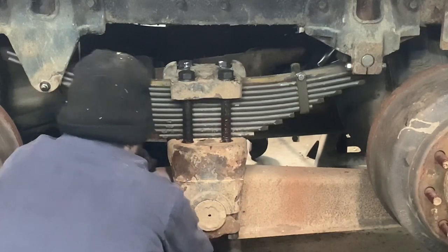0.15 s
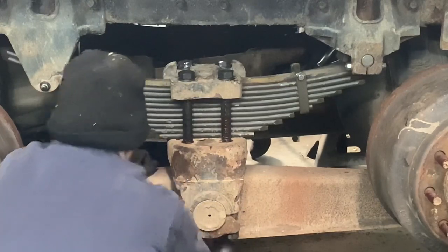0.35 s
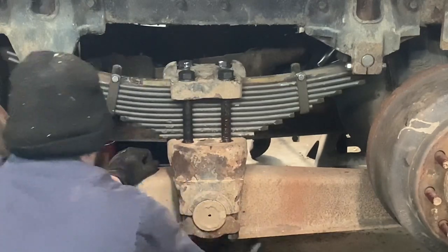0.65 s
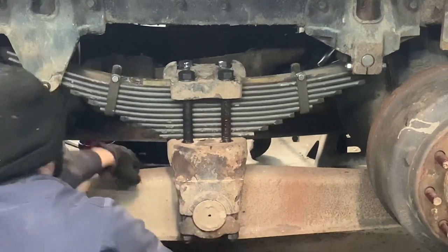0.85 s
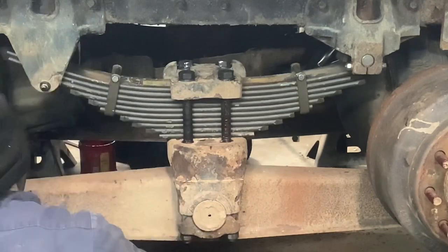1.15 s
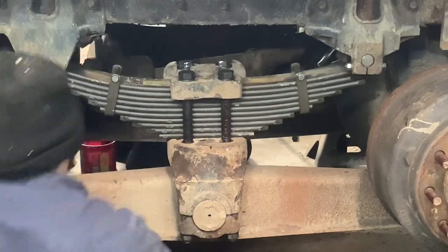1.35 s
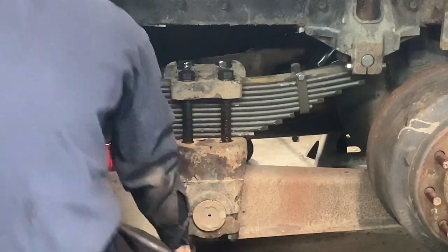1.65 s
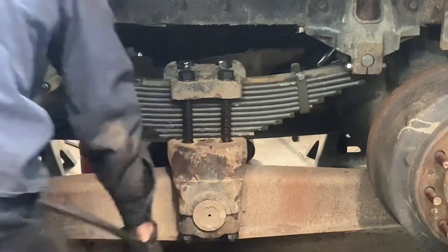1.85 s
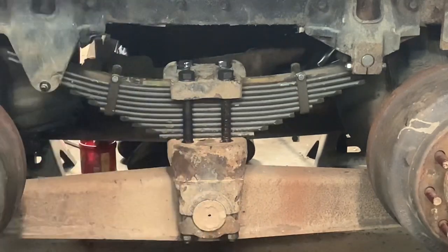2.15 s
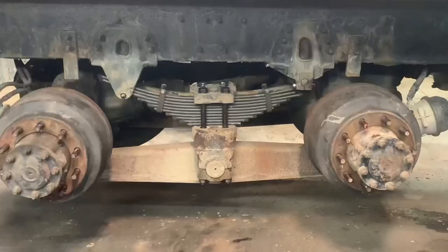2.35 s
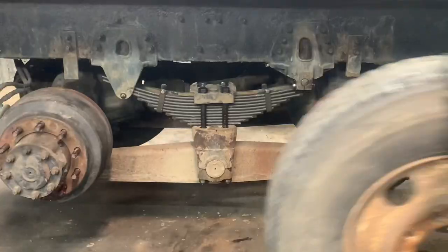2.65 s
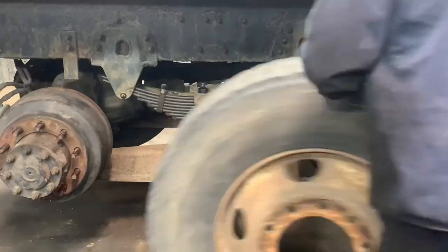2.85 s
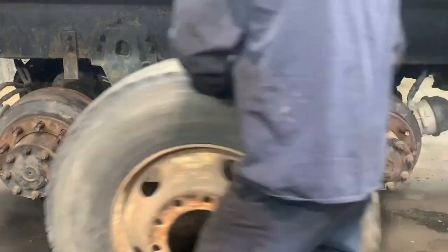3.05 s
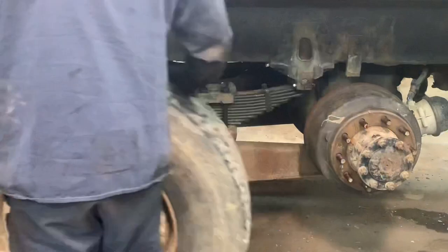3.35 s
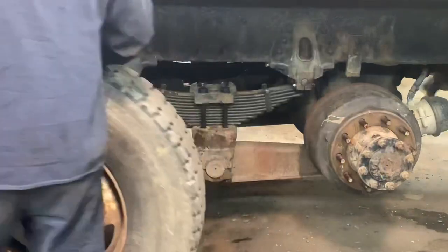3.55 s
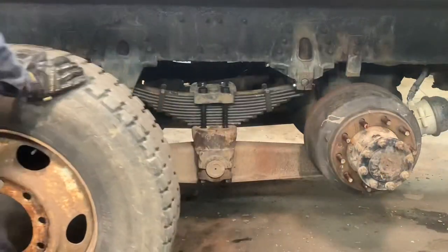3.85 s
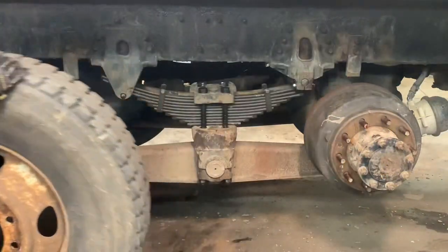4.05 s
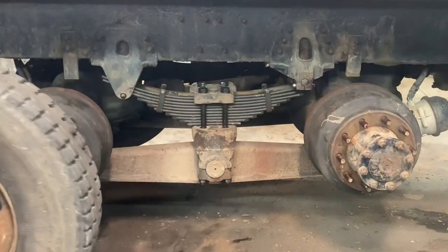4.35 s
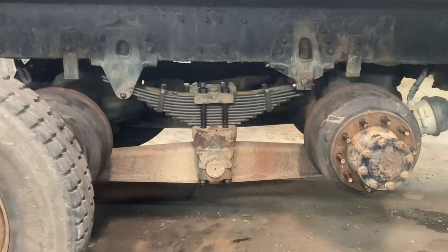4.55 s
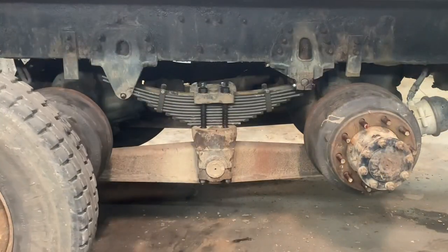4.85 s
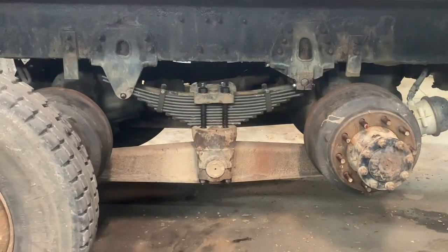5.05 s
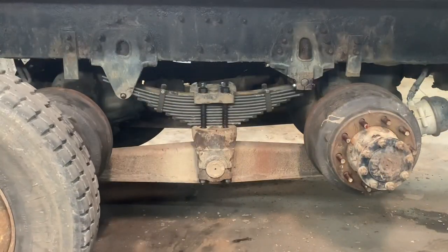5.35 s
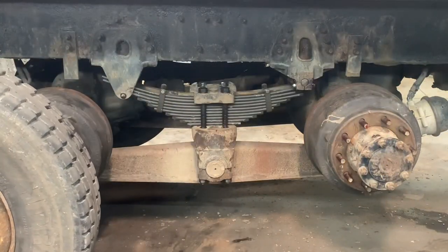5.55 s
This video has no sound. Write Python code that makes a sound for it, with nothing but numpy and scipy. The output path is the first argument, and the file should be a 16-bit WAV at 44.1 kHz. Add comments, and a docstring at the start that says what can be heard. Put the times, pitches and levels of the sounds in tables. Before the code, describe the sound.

A loud, throbbing air-tool drone roars under a truck, cuts off abruptly at just over two seconds, then quiet scuffs, tyre rolling and steel clanks follow.

```python
"""An air tool's supply machine drones under a truck in a workshop: multiples of one steady cycle, summed
as sines, over a throbbing noise roar of air and steel. A crash dies away at the start; the drone is soon cut.
Then a steel bar clanks and jingles as ringing modes, boots scuff and a tyre rolls on gritty concrete as
coloured noise, and things thud as struck dull bodies, over a low rumble of one chance-level sine and noise."""
import sys
import numpy as np
from scipy import signal
from scipy.fft import rfft, irfft, next_fast_len
from scipy.io import wavfile

SR = 44100
rng = np.random.default_rng(int(sys.argv[2]) if len(sys.argv) > 2 else 0)


def amplitude_ratio(level_db):
    """Convert a level in decibels to the matching linear amplitude (field) ratio."""
    exponent = np.asarray(level_db, float) / 20
    return 10 ** exponent


def digitize_waveform(pressure):
    """Quantize a signal to 16-bit integers and store it at the path in sys.argv[1].

    Rows of a 2-D input are taken as channels; values are limited to [-1, 1].
    """
    field = np.atleast_2d(pressure).T
    bounded = np.clip(field, -1, 1)
    quanta = np.round(bounded * 32767).astype(np.int16)
    wavfile.write(sys.argv[1], SR, quanta)


N = 250488
TIME = np.arange(N) / SR
HALF = np.array([[.5], [-.5]])   # shares a left-right difference between the two channels

# Stereo likeness of the drone's roar. Each row: frequency in Hz, correlation of left and right.
ROAR_LIKENESS = [(60, 0.98), (250, 0.48), (600, 0.96), (2000, 0.15), (5000, 0.14), (9000, 0.31)]
# Stereo balance of the roar. Each row: frequency in Hz, left over right in dB.
ROAR_BALANCE = [(60, -1.5), (100, -9.5), (180, -9.5), (320, 7.5), (550, -7.5), (960, 2), (1670, -1.5),
                (2900, 2), (5050, 1), (8790, -3.5)]
# Stereo phase of the drone and its roar. Each row: frequency in Hz, lead of the left in radians.
ROAR_LEAD = [(0, 0), (340, 0.61), (950, 1.57), (1550, 2), (1810, -2), (2330, 0), (2840, -1.5), (3360, -3.5),
             (3620, 2.7), (4310, 0.4), (5600, -0.7), (6980, -7.5), (7750, 4.5), (8960, 4.5)]
# Stereo likeness of the quiet workshop. Each row: frequency in Hz, correlation of left and right.
SHOP_LIKENESS = [(60, 0.93), (250, 1), (600, 0.81), (2000, 0.18), (5000, 0.26), (9000, 0.19)]
# Stereo balance of the quiet workshop. Each row: frequency in Hz, left over right in dB.
SHOP_BALANCE = [(60, -1.5), (100, -5.5), (180, -2), (320, 2), (550, 2.5), (960, -3), (1670, -2.5),
                (2900, 0.5), (5050, 1.5), (8790, -5.5)]
# Stereo phase of the quiet workshop. Each row: frequency in Hz, lead of the left in radians.
SHOP_LEAD = [(0, 0), (260, 1.26), (690, -1), (1460, 4), (2330, -0.5), (3360, -1.5), (3880, -4.5),
             (4220, -4), (5000, -10), (5770, -5), (6290, -8.5), (6550, -4.5), (7240, -8), (8960, -8.5)]
# Broad colour of a crash. Each row: frequency in Hz, relative density in dB per Hz.
CRASH_COLOUR = [(59, -33.5), (100, -10), (803, -12.5), (952, -17), (1290, -11.5), (1710, -10.5),
                (3200, -13), (6450, -17.5), (9240, -35), (12000, -77), (20300, -120)]


def rms_one(x):
    """Scales a signal to an rms of 1."""
    return x / np.sqrt(np.mean(x ** 2) + 1e-20)


def in_time(rows):
    """Draws straight lines through rows of a time in seconds and values, one curve per column."""
    seconds, *columns = np.transpose(rows)
    return [np.interp(TIME, seconds, column) for column in columns]


def at_hz(points, hz):
    """Reads a curve over frequency, straight on a logarithmic frequency axis."""
    points = np.array(points)
    return np.interp(np.log(hz), np.log(points[:, 0]), points[:, 1])


def drift(rate_hz):
    """Slow chance of spread 1: noise twice through a one-pole low-pass, made at every 40th sample."""
    pole = np.exp(-2 * np.pi * rate_hz * 40 / SR)
    slow = signal.lfilter([1], [1, -2 * pole, pole ** 2], rng.standard_normal(N // 40 + 2002))
    slow = rms_one(slow[2000:])   # skips the filter's settling
    return np.interp(np.arange(N) / 40, np.arange(len(slow)), slow)


def noise(spectrum, likeness, balance, lead, peaks=()):
    """Stereo noise of a given colour, likeness, balance and phase lead by frequency; the middle has rms 1."""
    size = next_fast_len(N)
    hz = np.maximum(np.fft.rfftfreq(size, 1 / SR), 1)
    inside = (hz > spectrum[0][0]) * (hz < spectrum[-1][0])
    power = amplitude_ratio(at_hz(spectrum, hz)) ** 2 * inside
    power = power / power.sum()
    for peak_hz, width_hz, peak_db in peaks:
        bell = np.exp(-.5 * ((hz - peak_hz) * 2 / width_hz) ** 2)
        power = power + amplitude_ratio(peak_db + 32) ** 2 * bell / bell.sum()   # -32 dB equals the whole broad colour
    alike = np.clip(at_hz(likeness, hz), -1, 1)
    mid, side = rfft(rng.standard_normal((2, size)))
    pair = np.sqrt(1 + alike) * mid + np.sqrt(1 - alike) * side * 2 * HALF
    pair = pair * np.exp(1j * HALF * np.interp(hz, *np.transpose(lead)))
    pair = pair * np.sqrt(power) * amplitude_ratio(at_hz(balance, hz) * HALF)
    out = irfft(pair, size)[:, :N]
    return out / np.sqrt(np.mean(out.mean(axis=0) ** 2))


def shop_noise(colour):
    """Noise with the stereo image of the quiet workshop."""
    return noise(colour, SHOP_LIKENESS, SHOP_BALANCE, SHOP_LEAD)


def drone(waver_db, throb, slip_rad):
    """Multiples of the cycle, the high ones blurred by uneven strokes, over a roar that throbs twice a cycle."""
    # The strong multiples of the cycle. Each entry: multiple of the cycle.
    multiples = [3, 4, 5, 6, 8, 9, 10, 11, 12, 14, 15, 17, 19, 20, 21, 22, 23, 24, 25, 26, 28, 30, 31, 37,
                 39, 43, 48, 54, 59, 64, 67, 72, 76, 83, 94]
    # Strength of those multiples, in the same order. Each row: left rms in dB, right rms in dB, before wavering.
    order_levels = [(-49, -45), (-39, -37.5), (-58, -50.5), (-54, -46), (-62, -62.5), (-61.5, -58.5),
                    (-53, -47), (-68.5, -64), (-55.5, -49), (-62.5, -56.5), (-55, -59), (-49, -54),
                    (-50.5, -48.5), (-49.5, -45), (-56.5, -55), (-51, -48), (-59.5, -68.5), (-52.5, -48.5),
                    (-66, -56.5), (-53, -38), (-61.5, -63.5), (-58, -58), (-56, -47.5), (-61.5, -53.5),
                    (-59.5, -54), (-55, -54), (-55, -54), (-60, -55), (-51.5, -55), (-67, -58.5),
                    (-62, -62), (-49.5, -59.5), (-68, -55), (-48.5, -59), (-57.5, -58.5)]
    # The drone swells in, holds and is cut. Each row: time in seconds, gain in dB.
    swell_and_cut = [(0, -5), (.12, -2), (.4, 0), (1.2, 0.5), (2.24, 1.5), (2.258, -4), (2.272, -43.5),
                     (5.68, -36)]
    # Broad colour of air and steel. Each row: frequency in Hz, relative density in dB per Hz.
    roar_colour = [(21, -33), (35, -9), (98, -9), (142, -8.5), (175, -23), (226, -14), (306, -20),
                   (575, -12), (761, -20.5), (836, -18), (1300, -17.5), (2080, -18.5), (3160, -24.5),
                   (6510, -21), (9240, -44.5), (9550, -54.5)]
    # Panels shaken by the drone. Each row: frequency in Hz, width in Hz, power in dB (-32 = the broad colour).
    panels = [(45, 12, -45.5), (65, 6, -48.5), (117.5, 6, -41.5), (131.2, 11, -42.5), (470, 32, -48),
              (590, 100, -58), (847, 78, -45.5), (1284, 79, -43), (1516, 230, -42), (2040, 280, -42.5)]
    cycle_hz = 22.325
    turn = 2 * np.pi * cycle_hz * TIME
    tones = np.zeros((2, N))
    for multiple, (left_db, right_db) in zip(multiples, order_levels):
        lead = np.interp(multiple * cycle_hz, *np.transpose(ROAR_LEAD)) * HALF
        height = np.sqrt(2) * amplitude_ratio([[left_db], [right_db]] + waver_db * drift(2.7))
        uneven_turn = turn + slip_rad * drift(3)
        tones += height * np.sin(multiple * uneven_turn + rng.uniform(0, 2 * np.pi) + lead)
    roar = amplitude_ratio(-37) * noise(roar_colour, ROAR_LIKENESS, ROAR_BALANCE, ROAR_LEAD, panels)
    throbbing_roar = roar * (1 + throb * np.sin(2 * turn))
    return amplitude_ratio(in_time(swell_and_cut)[0]) * (tones + throbbing_roar)


def bang():
    """A crash already dying away, fast at first and then with the hall."""
    # Resonances of the crash. Each row: frequency in Hz, width in Hz, power in dB (-32 = the broad colour).
    crash_peaks = [(129, 58, -42), (553, 67, -49.5), (795, 120, -40), (1268, 42, -38.5), (1470, 100, -57),
                   (3150, 170, -40.5)]
    fast_t60_s, hall_t60_s = 0.077, 0.48
    fall = amplitude_ratio(-30.5 - 60 * TIME / fast_t60_s) + amplitude_ratio(-28.5 - 60 * TIME / hall_t60_s)
    return fall * noise(CRASH_COLOUR, ROAR_LIKENESS, ROAR_BALANCE, ROAR_LEAD, crash_peaks)


def bar(uneven_db, flutter_db, split_hz):
    """Each touch feeds every mode with a strength of its own; modes come as close pairs that beat and flutter."""
    # Modes of the steel bar. Each row: frequency in Hz, dB in the clank, dB in the jingle, t60 in seconds.
    modes = [(930, -39, -5, 0.3), (1137, -34, -1.5, .2), (1240, -33, -5, 0.39), (1425, -20, -4, 0.15),
             (1590, -28, -15, .25), (1722, -39, 3.5, 0.15), (1810, -21, 1, 0.18), (1990, -0.5, -12, 0.075),
             (2290, -1, 0, 0.11), (2380, -14, -21, .2), (2740, -0.5, -4, 0.1), (2835, -17, -10, 0.19),
             (3260, -2, -39, 0.34), (3350, 2, -12, 0.3), (3934, 0.5, -14.5, 0.34), (4010, -24, -22, .2),
             (4255, -19, -28, .25), (4435, -7.5, -18, 0.33), (4590, -14, -21, 0.46), (4960, -16, -16, 0.3),
             (5400, -21, -18, 0.33), (5520, -11, -25, 0.32), (5770, 0, -18, 0.24), (5870, -7.5, -20, 0.4),
             (6300, -11, -17, 0.62), (6655, 5, -21, 0.2), (7100, -12, -19, 0.35), (7640, -20, -30, 0.23),
             (8200, -22.5, -34, 0.18), (8850, -17, -20, .15)]
    # Touches of the bar. Each row: start in seconds, level in dB, rattle length in seconds, 0 clank to 1 jingle.
    touches = [(4.026, -41, 0.039, 0.13), (5.129, -59.5, 0.057, 1), (5.199, -57, 0.044, 0.95),
               (5.26, -66, 0.058, 0.85), (5.31, -54, 0.044, 1), (5.402, -61.5, 0.068, 0.88),
               (5.489, -47.5, 0.069, 1), (5.586, -65, 0.04, 0.83), (5.641, -57, 0.029, 0.64)]
    out, first = np.zeros((2, N)), round(touches[0][0] * SR)
    t = np.arange(N - first) / SR
    for hz, clank_db, jingle_db, t60_s in modes:
        push = np.zeros(N)
        for start_s, touch_db, length_s, mix in touches:
            mix, at = np.clip(mix, 0, 1), round(start_s * SR)
            swell = np.hanning(round(length_s * SR))
            chance_db = uneven_db * rng.standard_normal()
            strength = amplitude_ratio(touch_db + clank_db + mix * (jingle_db - clank_db + chance_db))
            push[at:at + len(swell)] += (strength * swell / swell.sum())[:N - at]
        dying = signal.lfilter([1], [1, -amplitude_ratio(-60 / (t60_s * SR))], push[first:] + 1e-18)
        lead = np.interp(hz, *np.transpose(SHOP_LEAD)) * HALF
        phases = rng.uniform(0, 2 * np.pi, (2, 1, 1)) + lead
        apart_hz = split_hz * rng.uniform(0.31, 1)
        pair = np.sin(2 * np.pi * hz * t + phases[0])
        pair = pair + 0.52 * np.sin(2 * np.pi * (hz + apart_hz) * t + phases[1])
        out[:, first:] += dying * amplitude_ratio(flutter_db * drift(21)[first:]) * pair
    return out


def crack(start_s, peak_db, length_s):
    """The broad knock of the bar meeting the floor: one smooth swell of crash-coloured noise."""
    t = np.clip((TIME - start_s) / length_s, 0, 1)
    return amplitude_ratio(peak_db) * np.sin(np.pi * t) ** 2 * shop_noise(CRASH_COLOUR)


def strokes(start_s, hold_s, level_db, rise_db_per_s, fall_db_per_s):
    """Level in dB of every scuff: a steady rise, a hold, a steady fall."""
    start_s, hold_s, level_db = start_s[:, None], hold_s[:, None], level_db[:, None]
    rise_db = rise_db_per_s * np.maximum(start_s - TIME, 0)
    fall_db = fall_db_per_s * np.maximum(TIME - start_s - hold_s, 0)
    return level_db - rise_db - fall_db


def coloured(x, centre_hz, lift_db, sharpness):
    """A moving resonance stands out of the sound, block by block; power stays about even."""
    peak, state = np.zeros_like(x), np.zeros((2, 2))
    for i in range(0, N, 256):
        r = np.exp(-np.pi * centre_hz[i] / sharpness / SR)
        w = 2 * np.pi * centre_hz[i] / SR
        peak[:, i:i + 256], state = signal.lfilter([1 - r, 0, r - 1], [1, -2 * r * np.cos(w), r * r],
                                                   x[:, i:i + 256], zi=state)
    lift = amplitude_ratio(lift_db)
    return (x + lift * peak) / np.sqrt(1 + (2 * lift + lift ** 2) / sharpness)


def scuffs(patchy_db):
    """Rubber dragged on concrete: a mid scuff coloured by the loudest stroke, and a high hiss."""
    # Boots, tread and bar dragged on grit. Each row: start in seconds, hold in seconds, scuff level in dB,
    # hiss level in dB, colour of the scuff in Hz.
    drags = [(2.307, 0.42, -64, -65, 1290), (2.703, .07, -55.5, -59, 1290), (2.78, .01, -55, -52, 1330),
             (2.835, .11, -64.5, -64.5, 1540), (2.976, .07, -69, -69, 1600),
             (3.07, 0.1, -64.5, -69.5, 1380), (3.288, 0.023, -49.5, -56.5, 2450),
             (3.343, 0.017, -50, -56, 1830), (3.447, 0.042, -64, -68, 1700), (3.548, .02, -70, -70, 1900),
             (3.61, .03, -62.5, -67, 1100), (3.656, .035, -55, -63, 1110), (3.821, .04, -63, -71, 1300),
             (3.877, 0.087, -60.5, -67.5, 2050), (4.004, .17, -69.5, -65, 1750),
             (4.242, .01, -67.5, -64.5, 1620), (4.321, 0.038, -65.5, -66.5, 2160),
             (4.48, 0.014, -69.5, -65.5, 2240), (4.614, 0.059, -56, -60.5, 2230),
             (4.833, .1, -71, -68, 1900), (5.17, .14, -68, -75, 1750), (5.343, 0.0089, -49.5, -77, 1480),
             (5.415, .05, -66, -68, 1700), (5.524, .01, -48, -65, 1470), (5.573, .07, -61.5, -64, 1310),
             (5.672, .01, -53, -67, 990)]
    # Colour of rubber on concrete. Each row: frequency in Hz, relative density in dB per Hz.
    scuff_colour = [(500, -3), (800, -5.5), (1100, 1), (1500, 0), (2200, -1), (2900, -3), (3500, -35)]
    # Colour of the grit. Each row: frequency in Hz, relative density in dB per Hz.
    grit_colour = [(2500, -4.5), (3600, -1), (5200, -8), (6800, -4.5), (7800, -12), (9000, -21.5),
                   (10000, -33), (13000, -54)]
    start_s, hold_s, scuff_db, hiss_db, colour_hz = np.array(drags).T
    scuff_db = strokes(start_s, hold_s, scuff_db, rise_db_per_s=415, fall_db_per_s=270)
    hiss_db = strokes(start_s, hold_s, hiss_db, rise_db_per_s=330, fall_db_per_s=195)
    loudest_hz = colour_hz[scuff_db.argmax(axis=0)]
    scuff = coloured(shop_noise(scuff_colour), loudest_hz, lift_db=3.5, sharpness=2.5)
    # once the hiss narrows to a bright swish
    swish_s, swish_width_s = 2.787, 0.026
    swish_db = 10 * np.exp(-.5 * ((TIME - swish_s) / swish_width_s) ** 2)
    hiss = coloured(shop_noise(grit_colour), np.full(N, 5150), lift_db=2 + swish_db, sharpness=5.0)
    # between strokes each falls no lower than a faint bed
    scuff_db = np.maximum(scuff_db.max(axis=0), -93) + patchy_db * drift(23)
    hiss_db = np.maximum(hiss_db.max(axis=0), -80) + patchy_db * drift(25)
    return amplitude_ratio(scuff_db) * scuff + amplitude_ratio(hiss_db) * hiss


def burst(start_s, length_s):
    """A blow smeared into a short swell of noise, of unit energy on average."""
    out, at = np.zeros(N), round(start_s * SR)
    swell = np.hanning(round(length_s * SR))[:N - at]
    out[at:at + len(swell)] = swell * rng.standard_normal(len(swell)) / np.sqrt(np.sum(swell ** 2))
    return out


def ring(x, hz, t60_s):
    """A two-pole resonator: a unit click sets a dying sine of height 1 ringing."""
    r, w = amplitude_ratio(-60 / (t60_s * SR)), 2 * np.pi * hz / SR
    return signal.lfilter([0, np.sin(w)], [1, -2 * r * np.cos(w), r * r], x + 1e-18)


def thuds(shuffle_db):
    """A soft blow inside a short shuffle rings one dull body at the pitch of each thud."""
    # Dull blows. Each row: time in seconds, peak in dB before panning, pitch in Hz, left over right in dB.
    blows = [(0.835, -16, 259.6, 5), (2.551, -52.5, 205, 7), (2.757, -46.5, 205, 4), (3.133, -48, 249, -2),
             (5.348, -38.5, 436, 5), (5.659, -43, 527, 6)]
    # Modes of the dull body. Each row: multiple of the pitch, level in dB, t60 in seconds.
    body_modes = [(.8, 0, 0.094), (1.1, 1.5, 0.098), (1.35, -11, 0.053), (1.9, -4.5, 0.082),
                  (2.5, -2, 0.053), (3.7, -4, 0.038), (5, -7, 0.065)]
    out = np.zeros((2, N))
    for blow_s, peak_db, pitch_hz, pan_db in blows:
        push = amplitude_ratio(shuffle_db) * burst(blow_s - .015, 0.043)
        push[round((blow_s + .002) * SR)] -= 1
        body = np.zeros(N)
        for k, (multiple, mode_db, t60_s) in enumerate(body_modes):
            sense = -1 if k > 2 else 1   # upper modes start in the other sense
            body += sense * amplitude_ratio(mode_db) * ring(push, multiple * pitch_hz, t60_s)
        out += amplitude_ratio(peak_db + pan_db * HALF) * body / np.abs(body).max()
    return out


def tyre(patchy_db):
    """The tyre rolling: low noise whose level follows a drawn curve with patchy chance on top."""
    # Level of the rolling tyre. Each row: time in seconds, level in dB before the patchiness.
    rolling_level = [(2.27, -59), (2.29, -68), (2.55, -60.5), (2.66, -64), (2.74, -56.5), (3.07, -70.5),
                     (3.15, -52.5), (3.22, -70), (3.25, -62), (3.92, -65.5), (4.06, -61), (4.18, -70.5),
                     (4.25, -58.5), (4.98, -68.5), (5.31, -62), (5.36, -60), (5.41, -64.5), (5.68, -56)]
    # Colour of the rolling. Each row: frequency in Hz, relative density in dB per Hz.
    rolling_colour = [(80, -30.5), (130, -3), (250, -7), (500, -15.5), (800, -23), (1100, -68)]
    return amplitude_ratio(in_time(rolling_level)[0] + patchy_db * drift(25)) * shop_noise(rolling_colour)


def rumble_tone():
    """The chance level of the low rumble drawn as one sine of drifting pitch, a little stronger on the right."""
    # Chance level of the low rumble, drawn as one sine. Each row: time in seconds, rms level in dB
    # before the stereo tilt.
    chance_level = [(2.27, -68), (2.34, -44.5), (2.48, -70), (2.52, -49.5), (2.64, -52.5), (2.67, -70),
                    (2.76, -52.5), (3.35, -55), (3.37, -70), (3.46, -44.5), (3.7, -57), (3.77, -67),
                    (3.86, -43), (3.92, -70), (3.98, -48.5), (4.15, -47), (4.51, -57.5), (4.7, -48.5),
                    (4.75, -75), (4.77, -57.5), (5.55, -50), (5.57, -62), (5.63, -51), (5.68, -49.5)]
    hz = 58.7 + 1.28 * drift(3.1)
    tone = np.sin(2 * np.pi * np.cumsum(hz) / SR)
    return np.sqrt(2) * amplitude_ratio(in_time(chance_level)[0]) * tone * amplitude_ratio([[-1], [1]])


def rumble_bed(level_db):
    """A steady bed of low noise."""
    # Colour of the rumble. Each row: frequency in Hz, relative density in dB per Hz.
    rumble_colour = [(25, -12), (45, -1.5), (60, -1.5), (75, -6), (110, -5), (160, -21)]
    return amplitude_ratio(level_db) * shop_noise(rumble_colour)


def air(level_db):
    """A faint steady hiss of high noise."""
    # Colour of the hiss. Each row: frequency in Hz, relative density in dB per Hz.
    air_colour = [(8000, -2), (9500, -4.5), (11000, -2), (13000, -9)]
    return amplitude_ratio(level_db) * shop_noise(air_colour)


def shop():
    """The quiet workshop fades in just after the cut."""
    start_s, fade_s = 2.27, 0.04
    fade = np.clip((TIME - start_s) / fade_s, 0, 1)
    low_end = tyre(patchy_db=2.5) + rumble_tone() + rumble_bed(level_db=-55.0)
    return fade * (scuffs(patchy_db=0.5) + low_end + air(level_db=-94.5))


def scene():
    """The drone and the crash, then the bar, the thuds and the quiet workshop."""
    machine = drone(waver_db=1.0, throb=0.063, slip_rad=0.013) + bang()
    steel = bar(uneven_db=-0.5, flutter_db=5.0, split_hz=60) + crack(4.025, peak_db=-47, length_s=0.068)
    return machine + steel + thuds(shuffle_db=-5.5) + shop()


def low_pass(x):
    """Removes everything above the highest recorded frequency."""
    return signal.sosfilt(signal.butter(12, 12700, fs=SR, output="sos"), x)


def record(dry):
    """Turns the dry scene into the finished sound."""
    return low_pass(dry)


dry = scene()
out = record(dry)
digitize_waveform(out)
```